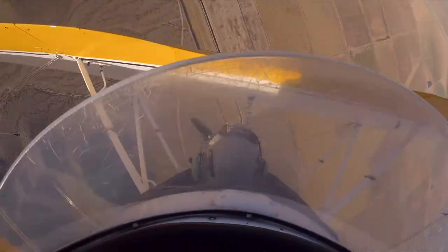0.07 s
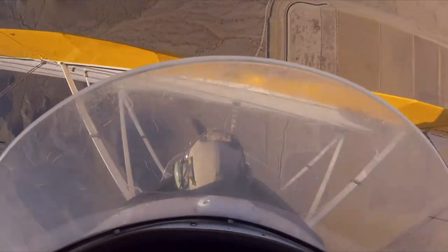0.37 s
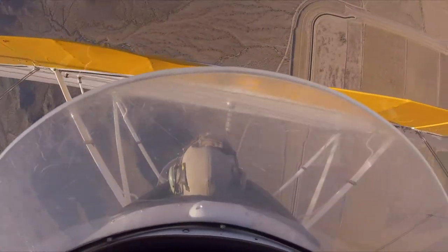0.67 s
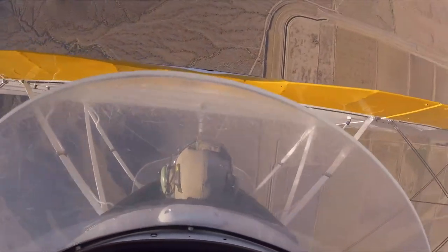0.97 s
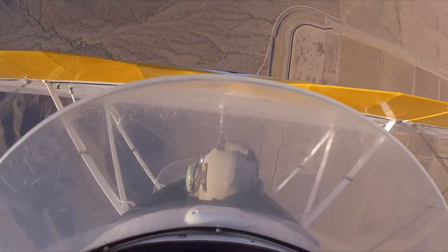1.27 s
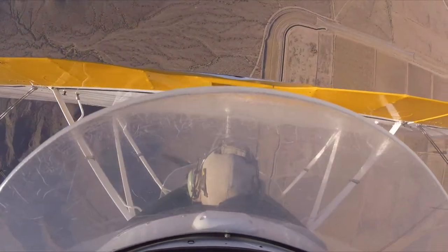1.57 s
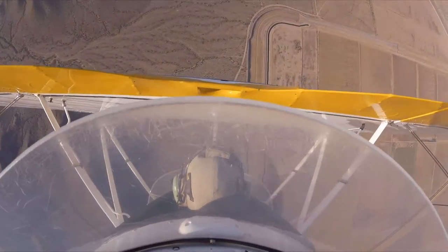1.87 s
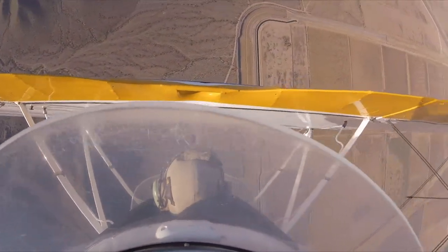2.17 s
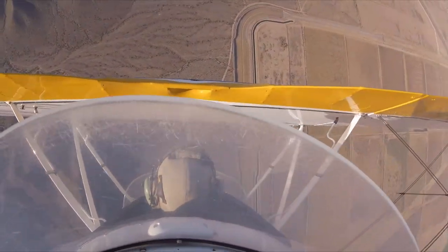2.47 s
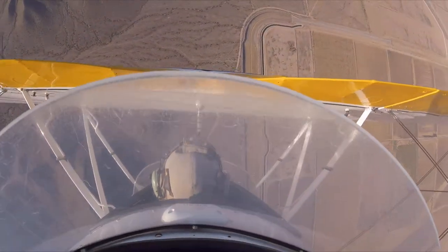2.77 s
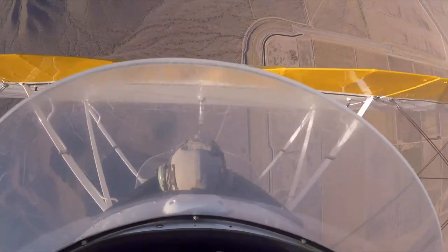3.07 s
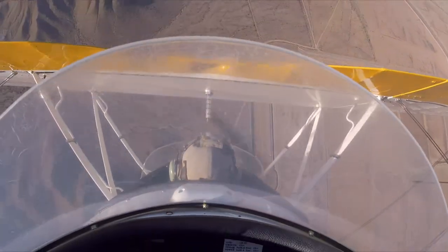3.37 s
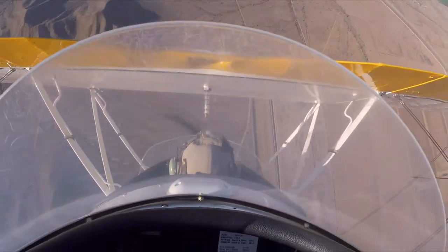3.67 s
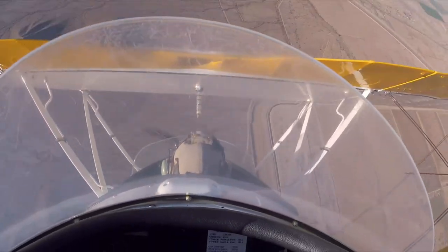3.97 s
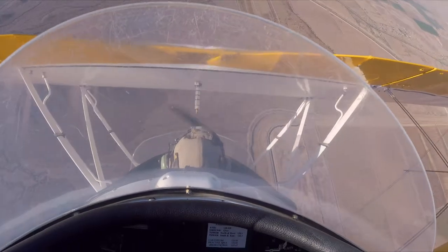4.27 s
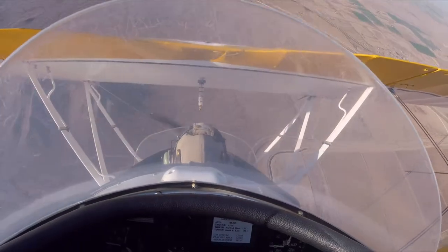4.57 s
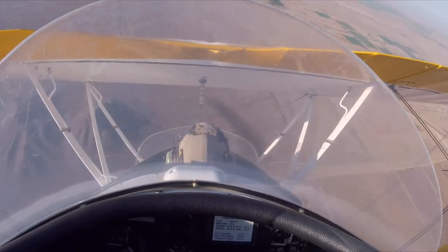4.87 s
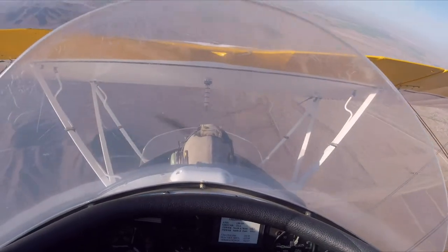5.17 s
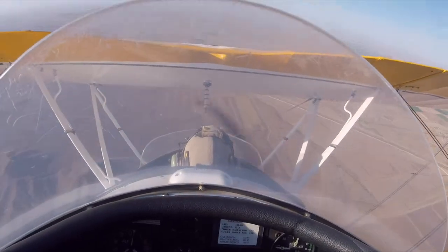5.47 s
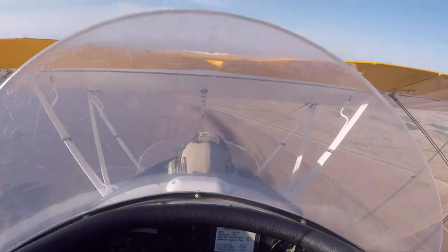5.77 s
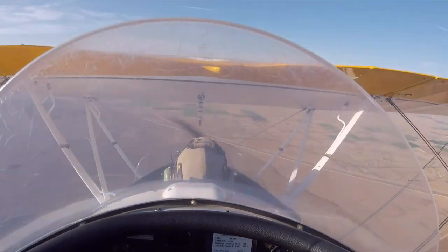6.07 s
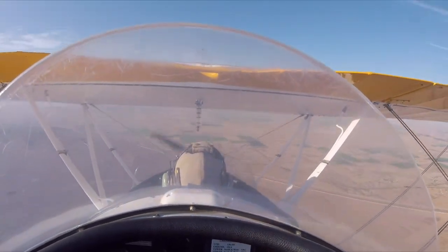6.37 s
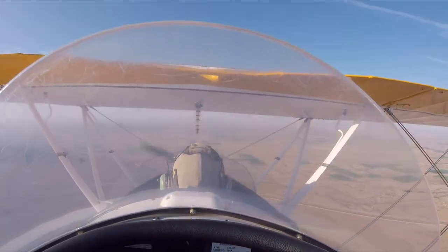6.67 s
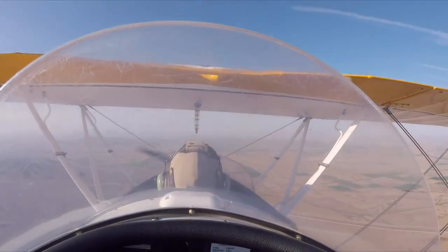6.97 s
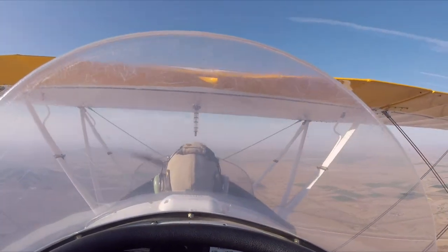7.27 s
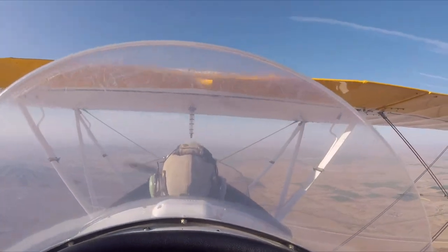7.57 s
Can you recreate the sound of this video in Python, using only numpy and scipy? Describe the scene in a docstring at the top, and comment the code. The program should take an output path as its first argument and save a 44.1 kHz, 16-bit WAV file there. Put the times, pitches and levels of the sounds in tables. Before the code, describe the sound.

From inside the open cockpit of a diving biplane, a deep, fluttering wind rumble hits the microphone, soon breaking into irregular cracks and crackles. Thin whistles from the wires climb in pitch and die away. In the second half, as the plane pulls up, the low drone of the engine comes forward, while the wind keeps roaring with a light hiss and only scattered cracks.

```python
"""Biplane dive and pull-up

Open cockpit, one microphone close behind the windscreen, diving out of a loop and pulling up.
The slipstream buffets the microphone and overloads it in cracks; the bracing wires whistle higher
as speed builds. Engine and propeller drone through the wind, and a limiter holds the roar down."""
import sys
import numpy as np
from scipy import signal
from scipy.fft import rfft, irfft, next_fast_len
from scipy.io import wavfile
from scipy.ndimage import uniform_filter1d, minimum_filter1d, map_coordinates

SR = 44100
rng = np.random.default_rng(int(sys.argv[2]) if len(sys.argv) > 2 else 0)


def unload_audio(sound):
    """Save the sound as a 16-bit wav file, at the path given as the first command line argument."""
    columns = np.transpose(np.atleast_2d(sound))
    # keep every value between -1 and 1, then stretch to whole-number steps
    steps = np.round(np.clip(columns, -1, 1) * 32767)
    wavfile.write(sys.argv[1], SR, steps.astype(np.int16))


N = 340893
TIME = np.arange(N) / SR
BREAKAWAY_S, PULL_UP_S = 0.89, 3.9  # the smooth flow breaks away; the nose comes up

# airspeed, given as the pitch of two whistling wires: time_s, thick_wire_hz, thin_wire_hz
WIRE_PITCHES = [(0, 3996, 4600), (.15, 4405, 4950), (.33, 4980, 5750), (.62, 5200, 6230), (.9, 5530, 6370),
                (1.17, 5950, 6480), (1.4, 6400, 7000), (1.68, 6750, 7450), (1.95, 7100, 7850),
                (2.25, 7500, 8130), (2.5, 7750, 8560), (2.85, 8050, 9250), (3.45, 8836, 10000),
                (4.3, 9100, 10490), (7.73, 8472, 10000)]
# spectra of three sizes of eddy at the microphone: frequency_hz, level_db
LARGE_EDDIES = [(8, -26.5), (18, -5.5), (35, 7), (55, -5), (80, 2), (160, -44)]
MIDDLE_EDDIES = [(25, -36.5), (50, -0.5), (75, 1), (130, -1), (185, -8), (240, -23), (330, -30.5),
                 (600, -58.5)]
SMALL_EDDIES = [(110, -35), (190, 5.5), (255, 0), (320, -9), (420, -20), (600, -38), (1200, -49)]
# gusts of separated flow: start_s, end_s, small_eddy_gain_db, crackle_db
FLOW_GUSTS = [(0.03, .03, -3, -35), (0.55, 0.95, 3, -44), (1.0, 1.04, 9, -31), (1.148, 1.18, 5.5, -32),
              (1.215, 1.25, 4, -26), (1.29, 1.42, 0, -30), (1.476, 1.95, 1.5, -29), (1.99, 2.32, 1, -32),
              (2.355, 2.84, 2.5, -35), (2.875, 3.3, 5.5, -31.5), (3.335, 4.05, 5, -38),
              (4.3, 5.0, -1.5, -49), (4.63, 4.66, 2, -39), (5.105, 5.647, 3, -42), (5.72, 6.4, 2, -46),
              (6.63, 7.73, 5, -39.5)]
GUST_FADES_S = (0.03, 0.018)  # attack, release
# lulls in the middle eddies that let vortices and drone through: start_s, end_s, gain_db
EDDY_LULLS = [(1.558, 2.33, -4), (3.2, 4.0, -1.5), (4.362, 5.05, -2.5), (5.25, 6.3, -1.8), (6.95, 7.73, -2)]
# spells of vortex shedding: start_s, end_s, first_hz, last_hz, level_db, overtone_db
VORTEX_SPELLS = [(0.102, 1.22, 20.82, 36.7, -17, -7), (1.551, 2.386, 46.17, 69.96, -12, -13.5),
                 (2.44, 2.676, 111.9, 120.7, -20, -33), (2.957, 3.15, 84.6, 86, -19, -19),
                 (6.41, 6.67, 80.5, 66.2, -21, -24)]

# engine speed: time_s, firing_hz
FIRING_RATE = [(0, 63.66), (.5, 70.23), (3.5, 85.5), (3.9, 81.3), (4.35, 81.8), (4.95, 86.3), (5.3, 84.5),
               (5.75, 83), (6.3, 82.6), (7.1, 83.2), (7.73, 82.8)]
# the drone swells through the wind: start_s, end_s, harmonic_number, level_db
DRONE_SWELLS = [(3.656, 3.93, 2, -13), (3.98, 4.15, 1, -19), (4.34, 6.363, 1, -16), (4.05, 5.1, 2, -23.5),
                (5.2, 6.85, 2, -20.5), (6.97, 7.747, 2, -13.2)]
# spectra of the air round the cockpit, slow and fast: frequency_hz, level_db
SLOW_ROAR = [(200, -13), (400, 0.5), (800, 3.5), (1100, -0.5), (1500, -4.5), (2100, -6.5), (2700, -12),
             (4200, -15.5), (7700, -25), (9500, -38), (11500, -52.5)]
FAST_ROAR = [(200, 1.5), (420, -2), (650, -0.5), (900, -6.5), (1250, -7.5), (1520, -5.5), (1850, -11),
             (2600, -14.5), (3600, -18), (4500, -30), (8000, -39.5), (12000, -51.5)]

# the loudest cracks of wind overloading the microphone: time_s, thud_db, edge_db, snap_db, spatter_ms
WIND_CRACKS = [(0.023, -32.5, -48.5, -80.5, 1.6), (0.03, -24.5, -43.0, -68.0, 1.3),
               (0.987, -34.5, -43.5, -71.5, 0.7), (1.02, -23.5, -26.5, -71.5, 0.9),
               (1.046, -35.5, -37.0, -81.0, 0.7), (1.069, -30.0, -41.5, -78.5, 0.8),
               (1.135, -38.0, -49.5, -80.5, 0.7), (1.166, -32.5, -49.0, -77.5, 0.9),
               (1.184, -37.0, -55.0, -82.0, 0.8), (1.213, -33.0, -47.0, -71.5, 0.9),
               (1.219, -36.5, -40.0, -67.0, 0.9), (1.227, -26.0, -34.5, -65.5, 2.1),
               (1.235, -25.0, -36.5, -68.0, 0.6), (1.249, -30.0, -41.5, -62.0, 1.3),
               (1.291, -25.5, -38.0, -68.5, 0.8), (1.298, -34.5, -43.5, -72.0, 0.6),
               (1.317, -30.0, -42.0, -67.0, 1.6), (1.335, -26.5, -39.5, -63.5, 2.3),
               (1.343, -26.5, -46.5, -69.0, 0.9), (1.362, -36.5, -60.5, -76.0, 0.7),
               (1.416, -29.5, -40.0, -67.0, 1.3), (1.422, -29.0, -47.0, -79.0, 1.3),
               (1.477, -29.0, -42.5, -71.0, 1.0), (1.488, -37.0, -47.5, -70.5, 0.8),
               (1.515, -30.5, -43.0, -65.5, 0.9), (1.529, -30.0, -43.5, -67.5, 1.1),
               (1.552, -33.5, -46.5, -76.5, 0.7), (1.584, -30.5, -45.5, -70.5, 1.8),
               (1.604, -27.0, -37.5, -60.5, 1.6), (1.629, -27.5, -37.5, -67.5, 0.8),
               (1.645, -33.5, -43.5, -75.5, 1.1), (1.694, -38.0, -44.0, -67.5, 0.8),
               (1.707, -35.0, -41.5, -65.0, 1.7), (1.716, -34.5, -46.0, -76.0, 0.6),
               (1.782, -33.0, -44.5, -68.0, 1.0), (1.802, -25.5, -44.5, -68.5, 2.2),
               (1.839, -31.5, -39.5, -68.5, 1.1), (1.848, -31.0, -37.0, -68.5, 0.6),
               (1.867, -37.5, -48.0, -76.5, 0.6), (1.873, -27.0, -40.5, -61.5, 1.0),
               (1.895, -34.5, -44.5, -73.5, 0.7), (1.929, -35.0, -45.5, -74.5, 2.0),
               (1.982, -27.5, -38.0, -59.5, 0.6), (2.001, -32.5, -43.0, -69.0, 0.6),
               (2.011, -34.5, -46.5, -76.0, 0.7), (2.035, -41.0, -48.0, -76.0, 0.8),
               (2.051, -36.0, -50.0, -76.0, 1.5), (2.079, -41.0, -47.0, -69.0, 1.6),
               (2.102, -35.0, -40.0, -71.5, 0.6), (2.122, -29.0, -37.5, -63.0, 1.3),
               (2.147, -30.0, -47.0, -75.5, 0.6), (2.228, -29.0, -37.5, -62.0, 0.6),
               (2.246, -23.0, -35.0, -60.0, 1.4), (2.274, -31.0, -40.5, -68.0, 0.6),
               (2.308, -30.0, -41.5, -71.5, 1.5), (2.368, -34.5, -51.0, -76.0, 1.1),
               (2.394, -37.0, -51.5, -76.0, 1.7), (2.429, -35.5, -46.5, -66.0, 1.3),
               (2.449, -50.0, -48.5, -73.0, 0.7), (2.726, -28.5, -45.5, -68.5, 1.3),
               (2.887, -33.5, -50.5, -68.5, 1.1), (2.896, -40.5, -46.5, -71.0, 0.9),
               (2.925, -32.0, -47.5, -70.5, 1.3), (2.952, -29.5, -44.5, -72.0, 1.0),
               (2.969, -29.5, -57.5, -72.5, 0.6), (2.997, -27.0, -46.5, -68.0, 1.1),
               (3.037, -37.5, -44.5, -72.5, 1.0), (3.044, -41.5, -46.0, -67.0, 0.9),
               (3.06, -39.0, -44.5, -65.5, 0.6), (3.069, -35.0, -47.5, -65.0, 1.0),
               (3.082, -28.5, -43.0, -71.0, 1.2), (3.141, -30.0, -49.0, -70.0, 1.5),
               (3.171, -36.5, -49.0, -71.0, 0.9), (3.181, -36.0, -48.0, -71.0, 2.1),
               (3.279, -32.0, -45.0, -71.5, 0.9), (4.336, -42.0, -54.0, -71.0, 1.0),
               (4.507, -38.5, -57.0, -74.0, 1.3), (4.57, -39.0, -47.0, -69.5, 1.6),
               (4.628, -39.0, -48.0, -71.0, 1.5), (4.657, -37.0, -46.5, -76.0, 1.5),
               (5.066, -41.0, -54.5, -73.0, 1.2), (5.091, -37.0, -46.5, -73.5, 0.8),
               (5.443, -37.0, -50.5, -75.0, 0.9), (5.857, -40.5, -52.0, -70.5, 1.6),
               (5.98, -34.0, -44.0, -69.0, 1.0), (6.131, -44.0, -46.5, -76.5, 1.0),
               (6.607, -41.0, -60.0, -75.0, 0.8), (6.663, -38.5, -58.0, -72.5, 1.1),
               (6.768, -39.0, -53.5, -70.5, 0.6), (6.85, -40.0, -52.0, -74.5, 1.2),
               (7.03, -36.0, -47.5, -75.5, 1.6), (7.289, -38.5, -50.0, -72.0, 1.0),
               (7.427, -37.5, -52.5, -77.5, 2.4), (7.48, -29.5, -47.0, -70.0, 1.6)]
# a crack's spectrum in three parts, thud, sharp edge and bright snap: frequency_hz, level_db
CRACK_THUD = [(100, -10.5), (280, 13.5), (450, 9), (800, 0), (1250, -6.5)]
CRACK_EDGE = [(1850, 0.5), (2600, -6.5), (3800, -15)]
CRACK_SNAP = [(5500, 5), (8000, 3), (10000, -4.5), (12000, -23)]
# spectrum of the small crackles: frequency_hz, level_db
CRACKLE_SPECTRUM = [(120, -17.5), (330, 4), (480, 0.5), (750, -8), (1300, -16.5), (2000, -25), (4000, -39),
                    (7000, -49), (10000, -49.5), (13000, -81.5)]

# how strongly the wires sing at each airspeed: thick_wire_hz, thick_wire_db, thin_wire_db
WIRE_LEVELS = [(3920, -50, -43), (4230, -44.5, -43.5), (4950, -44, -47), (5200, -48, -50),
               (5700, -45.5, -48.5), (6000, -44, -54), (6780, -48.5, -53), (7180, -54.5, -56),
               (7300, -58, -58.5), (7700, -64, -63.5), (8050, -65, -66), (8820, -65, -72), (9130, -77, -80)]
# struts whistle lower, loudest at low speed: ratio_to_thick_wire_pitch, width_hz, level_db
STRUT_WHISTLES = [(0.262, 48.7, -6), (0.445, 129.4, 0.5), (0.602, 248, -12), (0.771, 308, -13.5)]
# a wire sings out briefly: start_s, end_s, first_hz, last_hz, width_hz, level_db
WIRE_FLARES = [(0.013, 0.085, 3270, 3050, 260, -44), (0.05, 0.2, 4680, 5120, 280, -49),
               (0.11, 0.146, 3880, 4130, 260, -46), (0.195, 0.25, 2850, 3380, 400, -44),
               (0.276, 0.465, 5090, 5080, 160, -46), (0.293, 0.56, 4650, 4780, 240, -48),
               (0.68, 1.046, 4800, 5190, 300, -46.5), (1.088, 1.206, 6000, 6050, 400, -46),
               (1.246, 1.955, 5420, 6220, 1000, -53), (2.748, 3.05, 7040, 7700, 1000, -64),
               (3.3, 3.54, 8700, 8800, 450, -69)]
# cockpit resonances blown by the wind: pitch_hz, width_hz, level_db
COCKPIT_MODES = [(818, 215, -4.5), (1036, 340, -5), (1458, 290, -8.5)]
# swells of the cockpit howl: start_s, end_s, level_db
HOWL_SWELLS = [(4.6, 4.7, -43), (5.1, 5.455, -40.5), (5.9, 6.0, -47.5), (6.602, 6.704, -41.5),
               (6.948, 7.25, -42.5)]
# spectrum of the fine hiss of air: frequency_hz, level_db
HISS_SPECTRUM = [(3000, -19), (4600, -10), (5400, -2), (6600, 0), (7900, -2), (9000, -6.5), (10200, -8.5),
                 (11000, -14), (12000, -23), (14000, -25)]
# swells of hiss in the pull-up: start_s, end_s, release_s, level_db
HISS_SWELLS = [(4.0, 5.3, 5.5, -55), (7.0, 7.27, 0.54, -54)]


def buffeting(coupling=0.68, large_gust_share=0.48, flutter_db=-0.6, lull_fade_s=0.14):
    """Eddies press on the microphone, finer with speed; swells of the middle ones break into small ones."""
    gusts_db = sum(db * plateau(start, end, *GUST_FADES_S) for start, end, db, _ in FLOW_GUSTS)
    lulls_db = sum(db * plateau(start, end, lull_fade_s) for start, end, db in EDDY_LULLS)
    eddies = noise(MIDDLE_EDDIES)
    swell = unit(np.abs(signal.hilbert(eddies, next_fast_len(N))[:N]))
    breakup = unit(noise(SMALL_EDDIES) * swell ** coupling * undb(flutter_db * walk(36)))
    large = noise(LARGE_EDDIES) * by_speed(-28, db_per_doubling=-12) * undb(large_gust_share * gusts_db)
    middle = eddies * by_speed(-10, db_per_doubling=5) * undb(lulls_db)
    small = breakup * by_speed(-23, db_per_doubling=6) * undb(gusts_db)
    return large + middle + small, swell


def vortices(wobble=0.0081, throb_db=2.5, fade_s=0.078):
    """Vortices leave the windscreen in step for a spell, their rate gliding evenly."""
    out = 0
    for start, end, first_hz, last_hz, db, overtone_db in VORTEX_SPELLS:
        hz = np.interp(TIME, [start, end], [first_hz, last_hz])
        phase = 2 * np.pi * np.cumsum(hz * (1 + wobble * walk(24.52))) / SR
        tone = unit(np.sin(phase) + undb(overtone_db) * np.sin(2 * phase))
        out += tone * undb(db) * plateau(start, end, fade_s)
    return out * undb(throb_db * walk(13))


def engine(wobble=0.0038, throb_db=0.5, floor_db=-30.5, fade_s=0.1, exhaust_db=-37, step_db=-13.5):
    """Firings and propeller blades drone on two swelling harmonics, with faint exhaust overtones."""
    firing_hz, = curves(FIRING_RATE)
    phase = 2 * np.pi * np.cumsum(firing_hz * (1 + wobble * walk(25))) / SR
    drone = 0
    for harmonic in (1, 2):
        swells = sum(undb(db) * plateau(start, end, fade_s)
                     for start, end, number, db in DRONE_SWELLS if number == harmonic)
        gain = np.maximum(swells, undb(floor_db)) * undb(throb_db * walk(22))
        drone += gain * np.sin(harmonic * phase)
    for k, order in enumerate(np.arange(5, 11) / 2):  # exhaust, in half-order steps
        drone += undb(exhaust_db + step_db * k) * np.sin(order * phase + 2 * np.pi * rng.random())
    return np.sqrt(2) * drone, phase


def slipstream(blade_phase, smooth_db=-32.5, broken_db=-44, break_s=0.42, flutter_db=1, chop=0.073):
    """Propeller-chopped air: a bright roar drops at the breakaway and a darker one grows with speed."""
    smooth = undb(smooth_db) * plateau(0, BREAKAWAY_S, break_s)
    broken = undb(broken_db) * plateau(0, BREAKAWAY_S + break_s, break_s, release_s=1.6)
    bright = noise(SLOW_ROAR) * np.maximum(smooth, broken)
    dark = noise(FAST_ROAR) * by_speed(-41, db_per_doubling=11)
    return (bright + dark) * undb(flutter_db * walk(70)) * (1 + chop * np.sin(blade_phase))


def cracks(gain_db=0.4, spatter_share=0.17, sputter_share=0.04, sputter_ms=4.0, size=1024):
    """Wind overloads the microphone in sharp cracks: brief spatter round a click, in a fainter sputter."""
    out = np.zeros(N + size)
    lead = size // 3
    from_click_ms = 1000 * np.abs(np.arange(size) - lead) / SR
    window = signal.get_window(("tukey", .5), size)
    thud_band = signal.butter(3, [400, 1400], "bandpass", fs=SR, output="sos")
    for time_s, thud_db, edge_db, snap_db, spatter_ms in WIND_CRACKS:
        spatter = spatter_share * np.exp(-from_click_ms / spatter_ms)
        sputter = sputter_share * np.exp(-from_click_ms / sputter_ms)
        burst = (spatter + sputter) * rng.standard_normal(size)
        burst[lead] += rng.choice([-1, 1])  # the click
        shape = response(crack_spectrum(thud_db, edge_db, snap_db), size=4096)
        crack = signal.fftconvolve(burst, shape)[:size] * window
        thud_rms = np.sqrt(np.mean(signal.sosfilt(thud_band, crack) ** 2))
        i = max(int(time_s * SR) - lead, 0)
        out[i:i + size] += crack / thud_rms * undb(thud_db + gain_db)
    return out[:N]


def crackle(swell, calm_db=-48, per_second=600, spread_db=3.5, largest_db=8):
    """Countless smaller cracks of uneven size crowd into the buffeting's swells, louder in gusts."""
    gusts = sum(undb(db) * plateau(start, end, *GUST_FADES_S) for start, end, _, db in FLOW_GUSTS)
    sizes = undb(np.minimum(spread_db * rng.exponential(size=N), largest_db))
    onsets = rng.random(N) < swell ** 2 * per_second / SR
    pops = onsets * sizes * rng.choice([-1, 1], N)
    return unit(colour(pops, CRACKLE_SPECTRUM)) * np.maximum(gusts, undb(calm_db))


def ticks(swell, per_second=18, level_db=-31, spread_db=2.0):
    """Faint stray cracks tick on throughout, likeliest where the buffeting swells."""
    onsets = rng.random(N) < swell ** 2 * per_second / SR
    snaps = onsets * undb(spread_db * rng.standard_normal(N))
    return undb(level_db) * colour(snaps, crack_spectrum(thud_db=0, edge_db=-11, snap_db=-37))


def wires(core_db=-6, wake_db=1.5, waver=0.008, ragged_db=0.0, fade_s=0.94):
    """Wires and struts shed aeolian whistles and a breathy wake, rising with speed until the pull-up."""
    thick_hz, thin_hz = curves(WIRE_PITCHES)
    song_hz, *song_db = np.transpose(WIRE_LEVELS)
    thick_gain, thin_gain = (undb(np.interp(thick_hz, song_hz, db) + ragged_db * walk(22))
                             for db in song_db)  # at ragged_db 0 these follow airspeed alone
    speed = thick_hz / thick_hz.max()
    gust = 1 + waver * walk(18)
    thick = narrow(thick_hz * gust, width_hz=650)
    core = narrow(thick_hz * gust, width_hz=200) * undb(core_db)
    thin = narrow(thin_hz * gust, width_hz=420)
    whistles = (thick + core) * thick_gain + thin * thin_gain
    wake = narrow((thick_hz + thin_hz) / 2, width_hz=1400)
    wake *= speed * (thick_gain + thin_gain) * undb(wake_db)
    struts = sum(undb(db) * narrow(ratio * thick_hz * gust, width) for ratio, width, db in STRUT_WHISTLES)
    struts *= by_speed(-84, db_per_doubling=-37)
    return (whistles + wake + struts) * plateau(0, PULL_UP_S, fade_s)


def wire_flares(fade_s=0.075, flutter_db=3.0):
    """A wire catches the flow for a moment and sings out, usually gliding upward."""
    out = 0
    for start, end, first_hz, last_hz, width_hz, db in WIRE_FLARES:
        hz = np.interp(TIME, [start, end], [first_hz, last_hz])
        out += narrow(hz, width_hz) * undb(db) * plateau(start, end, fade_s)
    return out * undb(flutter_db * walk(25))


def cockpit_howl(drift=0.01534, flutter_db=1.5, fade_s=0.43):
    """As the nose rises the slipstream blows into the cockpit and sounds its hollows."""
    swells = np.max([undb(db) * plateau(start, end, fade_s) for start, end, db in HOWL_SWELLS], axis=0)
    modes = sum(undb(db) * narrow(hz * (1 + drift * walk(7.8)), width) for hz, width, db in COCKPIT_MODES)
    return modes * swells * undb(flutter_db * walk(35))


def hiss(rise_s=2.8):
    """A fine hiss of air behind the roar grows with speed and swells during the pull-up."""
    swells = [undb(db) * plateau(start, end, rise_s, release) for start, end, release, db in HISS_SWELLS]
    gain = np.maximum(by_speed(-60, db_per_doubling=8), np.max(swells, axis=0))
    return noise(HISS_SPECTRUM) * gain


def by_speed(top_speed_db, db_per_doubling):
    """Gain that has a given level at top speed and changes with each doubling of the airspeed."""
    hz = curves(WIRE_PITCHES)[0]
    return undb(top_speed_db + db_per_doubling * np.log2(hz / hz.max()))


def crack_spectrum(thud_db, edge_db, snap_db):
    """Join thud, edge and snap, each at its own level, into one spectrum."""
    parts = (CRACK_THUD, thud_db), (CRACK_EDGE, edge_db), (CRACK_SNAP, snap_db)
    return [(hz, db + part_db) for part, part_db in parts for hz, db in part]


def plateau(start_s, end_s, fade_s, release_s=None):
    """An envelope that rises before its start, holds at 1 and falls after its end."""
    rise = (TIME - start_s) / fade_s
    fall = (end_s - TIME) / (release_s or fade_s)
    return np.clip(np.minimum(rise, fall) + 1, 0, 1)


def narrow(hz, width_hz):
    """A tone of random strength and phase, smeared over a band round a moving pitch."""
    phase = 2 * np.pi * np.cumsum(hz) / SR
    lowpass = signal.butter(3, width_hz / 2, fs=SR, output="sos")
    a, b = signal.sosfilt(lowpass, rng.standard_normal((2, N)))
    return unit(a * np.cos(phase) + b * np.sin(phase))


def walk(rate_hz):
    """A smooth random wander that changes about rate_hz times a second, rms 1."""
    knots = rng.standard_normal(8192)
    return unit(map_coordinates(knots, [TIME * rate_hz], order=3, mode="mirror"))


def noise(spectrum):
    """Coloured noise, rms 1."""
    return unit(colour(rng.standard_normal(N), spectrum))


def colour(x, spectrum):
    """Pass a sound through a spectrum."""
    return signal.fftconvolve(x, response(spectrum))[:N]


def response(spectrum, size=65536):
    """Causal impulse response of a spectrum, peak 1; the gain falls steeply above the last point."""
    hz, db = np.transpose(spectrum)
    octave = np.log2(np.arange(size // 2 + 1) * SR / size + 1)
    gain_db = np.interp(octave, np.log2(hz), db) - 20 * np.maximum(octave - np.log2(hz[-1]), 0)
    cepstrum = irfft(np.log(undb(gain_db)))
    cepstrum[1:size // 2] *= 2  # fold to minimum phase
    cepstrum[size // 2 + 1:] = 0
    impulse = irfft(np.exp(rfft(cepstrum)))
    return impulse / np.abs(impulse).max()


def curves(table):
    """The columns of a table, joined by straight lines in time."""
    time_s, *columns = np.transpose(table)
    return [np.interp(TIME, time_s, column) for column in columns]


def unit(x):
    """Scale to rms 1."""
    return x / np.sqrt(np.mean(x ** 2))


def undb(db):
    """Decibels to gain."""
    return 10 ** (np.asarray(db) / 20)


def scene():
    """Everything meets at one microphone in the cockpit."""
    drone, blade_phase = engine()
    rumble, swell = buffeting()
    airflow = rumble + vortices() + slipstream(blade_phase) + hiss()
    airframe = cockpit_howl() + wires() + wire_flares()
    return (airflow + drone + airframe + cracks() + crackle(swell) + ticks(swell))[None]


def record(dry, drive_db=0.5, ceiling=0.79, hold_s=0.015, top_hz=14500, fade_out_s=0.004):
    """A fast limiter ducks everything under bass swells and sharp peaks; the top is cut."""
    x = dry[0] * undb(drive_db)
    bass = signal.sosfiltfilt(signal.butter(2, 500, fs=SR, output="sos"), x)
    peak = np.maximum(np.abs(bass), .8 * np.abs(x))
    hold = int(hold_s * SR)
    gain = minimum_filter1d(ceiling / np.maximum(peak, ceiling), hold)
    gain = uniform_filter1d(uniform_filter1d(gain, hold // 2), hold // 2)
    fade = np.minimum((TIME[-1] - TIME) / fade_out_s, 1)
    top_cut = signal.ellip(8, .2, 70, top_hz, fs=SR, output="sos")
    return signal.sosfilt(top_cut, x * gain * fade)[None]


dry = scene()
out = record(dry)
unload_audio(out)
```